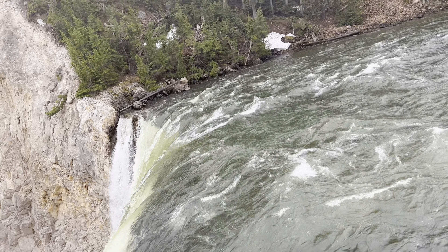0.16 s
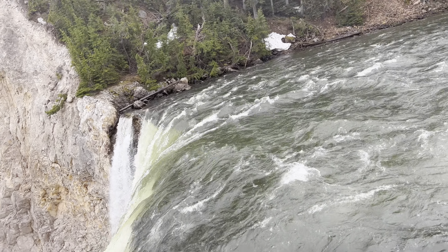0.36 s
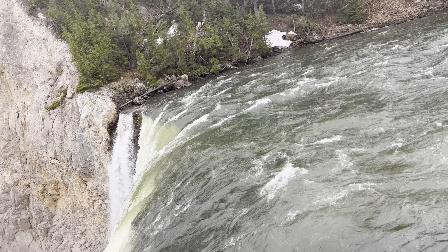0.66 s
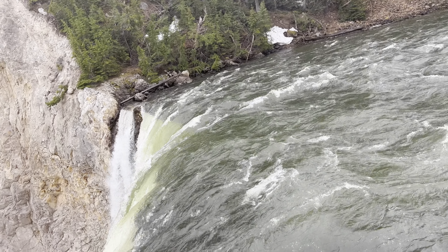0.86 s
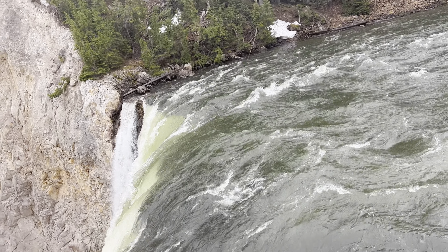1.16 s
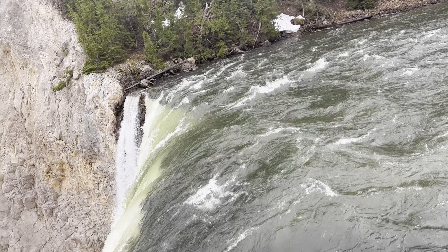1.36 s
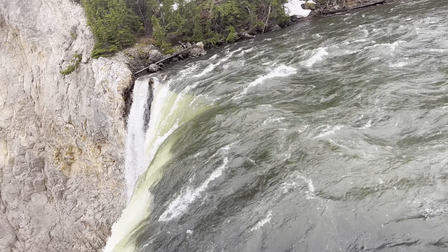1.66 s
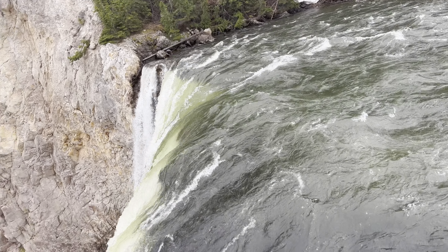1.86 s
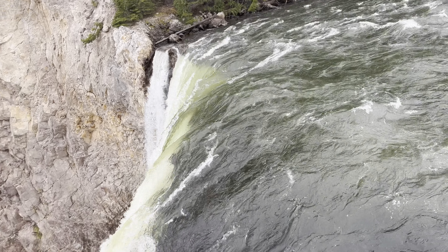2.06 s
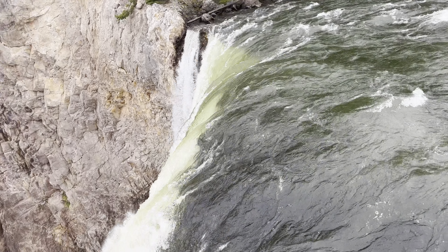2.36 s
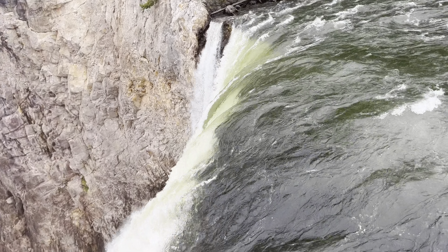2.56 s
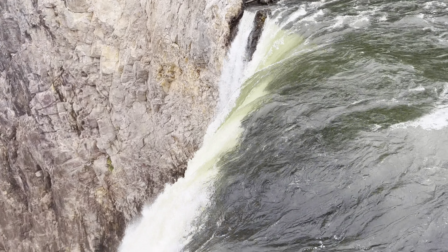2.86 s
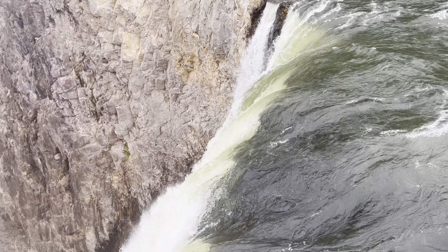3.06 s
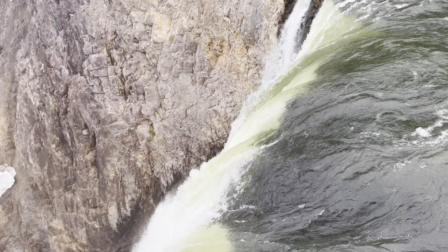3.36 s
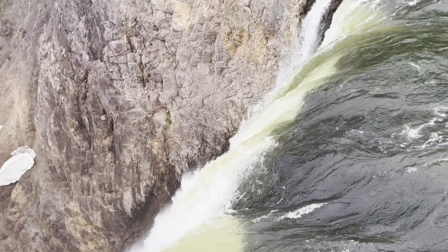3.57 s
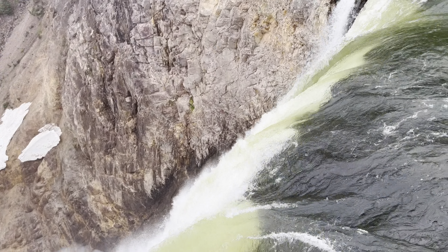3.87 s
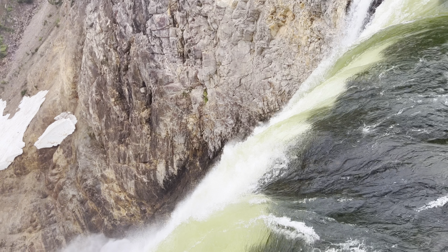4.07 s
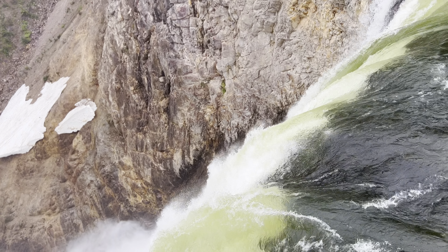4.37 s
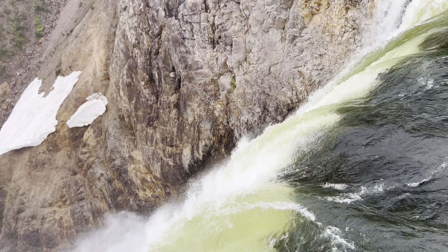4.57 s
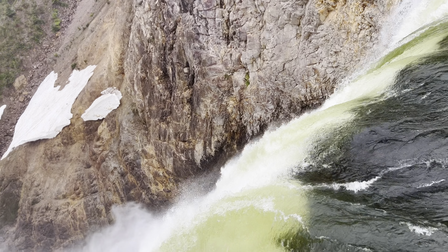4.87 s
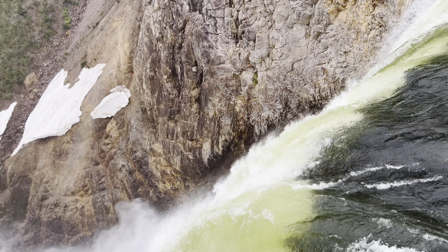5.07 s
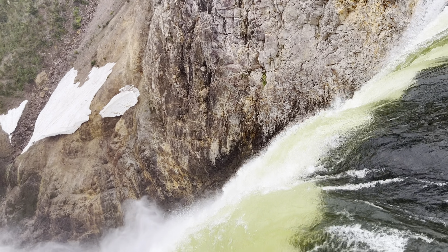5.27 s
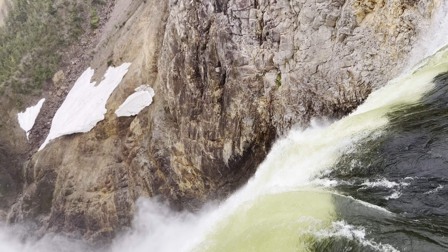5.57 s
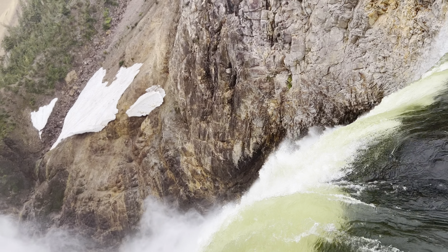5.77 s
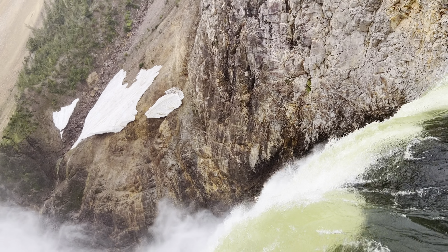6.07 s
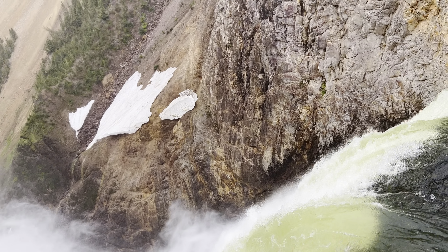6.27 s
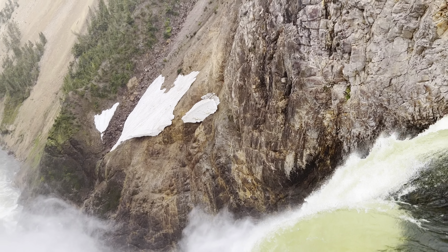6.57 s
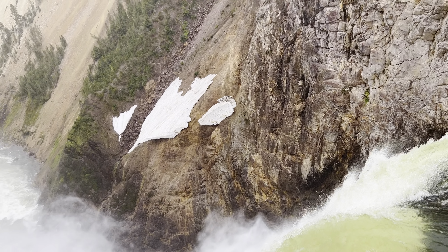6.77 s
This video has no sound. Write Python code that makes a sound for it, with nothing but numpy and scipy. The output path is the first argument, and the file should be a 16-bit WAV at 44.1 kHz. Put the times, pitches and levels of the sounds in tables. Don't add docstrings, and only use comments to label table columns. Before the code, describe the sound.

A powerful river roars continuously in an open canyon, heard through a handheld phone in stereo. From 0 to 2 s the rapids give a broad, even rush with airy hiss, while wind rumbles low and unevenly on the microphone, with a cluster of soft thumps around 0.2-0.4 s and more knocks near 0.7 and 0.9 s. Between about 2.2 and 3.6 s the phone turns to the brink and the roar swells by a few decibels, becoming fuller. Wind strengthens from 3.3 s, deep and fluttering, heaviest around 4.4-5.3 s, with thumps near 3.9, 4.4, 4.7 and 5.2 s. After 5.4 s the gusts ease to shorter flutters and rustles while the waterfall keeps pouring steadily. Small spray ticks land mostly on the right, the sharpest near 4.9 and 6.3 s. It stops at about 6.9 s, still roaring.

```python
import sys
import numpy as np
from scipy import signal
from scipy.fft import rfft, irfft, next_fast_len
from scipy.io import wavfile
from scipy.ndimage import uniform_filter1d, map_coordinates

SR = 44100
rng = np.random.default_rng(int(sys.argv[2]) if len(sys.argv) > 2 else 0)


def field_ratio(decibels):
    return 10 ** (np.asarray(decibels, dtype=float) / 20)


def master_out(mix):
    frames = np.transpose(np.atleast_2d(mix))
    ceiling = np.clip(frames, -1, 1)
    pcm = np.round(ceiling * 32767).astype(np.int16)
    wavfile.write(sys.argv[1], SR, pcm)


N = 305613
SIZE = next_fast_len(N)

# frequency_hz, density_db_per_hz, left_over_right_db, likeness_0_to_1, left_lead_rad
RAPIDS_ROAR = [(120, 7, -0.1, 0.93, 0.2), (300, 7, -0.5, 0.85, 0.3), (550, 5.2, 0.9, 0.63, 1.0),
               (850, 3.1, 1.9, 0.65, 1.8), (1150, -0.0, 2.1, 0.45, 2.0), (1450, -1.3, 0.2, 0.24, 2.6),
               (1750, -3.8, -2.7, 0.15, -0.7), (2050, -3.8, 0.3, 0.22, -1.0), (2400, -4.6, 2.2, 0.16, 1.2),
               (3000, -6.6, 4.9, 0.36, 0.8), (3900, -8.5, 5.3, 0.56, 0.5), (4800, -9.4, 8.4, 0.4, 0.8),
               (5600, -12.6, 6.0, 0.43, -0.9), (6300, -14.6, 5.3, 0.18, -0.1)]
BRINK_ROAR = [(120, 7, -0.4, 0.81, -0.1), (300, 7, -0.4, 0.78, 0.2), (550, 7, 1.4, 0.68, 1.0),
              (850, 4.0, 2.8, 0.48, 1.1), (1150, 3.2, 3.1, 0.53, 1.1), (1450, 2.0, 3.7, 0.26, 1.5),
              (1750, -0.9, 1.0, 0.34, -2.0), (2050, -3.8, -0.8, 0.28, -1.1), (2400, -3.5, 1.2, 0.41, 0.3),
              (3000, -5.0, 4.5, 0.54, 1.0), (3900, -7.1, 4.5, 0.72, 0.6), (4800, -9.4, 4.3, 0.56, 0.7),
              (5600, -11.9, 3.6, 0.53, -0.7), (6300, -13.1, 4.1, 0.17, -1.8)]
FALL_ROAR = [(120, 7, -0.4, 0.78, 0.0), (300, 7, -0.9, 0.8, 0.1), (550, 6.2, 0.2, 0.7, 0.7),
             (850, 2.8, 2.6, 0.54, 0.9), (1150, 1.4, 3.3, 0.44, 0.3), (1450, 1.2, 2.7, 0.44, 0.3),
             (1750, -1.2, 1.5, 0.42, -0.8), (2050, -1.7, -0.1, 0.39, -0.6), (2400, -3.7, 0.2, 0.4, 0.2),
             (3000, -5.5, 2.4, 0.65, 0.8), (3900, -6.7, 3.7, 0.79, 0.4), (4800, -10.0, 4.7, 0.48, 0.4),
             (5600, -11.9, 3.8, 0.55, -0.4), (6300, -13.4, 4.2, 0.19, 0.3)]
# frequency_hz, density_db_per_hz
SPRAY_HISS = [(7000, 3), (7600, 1), (8500, -0.4), (9500, -0.5), (10500, -3.5), (11500, -6), (13000, -6),
              (14300, -6), (15500, -8.5)]
# frequency_hz, gain_db
ROAR_COLOUR = [(500, -0.24), (1000, 0), (1600, 0.54), (2500, 1), (3300, -0.15), (6300, -0.14)]
# time_s, aim (0 rapids, 1 brink, 2 and beyond fall), roar_db
PHONE_TURN = [(0, 0.036, -30), (1.0, 0.069, -29.5), (1.3, 0.1, -28.5), (2.2, 0.13, -28), (2.9, 0.67, -26.7),
              (3.6, 1.08, -26), (4.3, 1.32, -26), (4.9, 2.03, -26.5), (5.45, 1.97, -26), (6.0, 3, -26.5),
              (6.93, 3.9, -26.5)]
# time_s, strength_db, large_over_middle_eddies_db
WIND_COURSE = [(0, -32.5, 4.5), (0.5, -35.5, 5), (0.85, -29, -1.5), (1.2, -37.5, 8), (1.5, -28.5, -1.5),
               (2.1, -29.5, -0.5), (2.5, -28, -0.5), (3.3, -24.5, -2.5), (3.7, -23, 1.5), (4.3, -24, 3.5),
               (4.45, -22, 5.5), (4.9, -23, 5.5), (5.2, -23.5, 5.5), (5.27, -23, -6), (5.45, -28, 1.5),
               (6.2, -28.5, -6), (6.35, -25.5, -1.5), (6.93, -27, -0.5)]
# centre_s, swell_db, eddy_hz, half_length_s
GUSTS = [(.08, 3.5, 60, 0.056), (.27, 6, 170, .06), (.34, 2, 60, .04), (.37, 8, 320, .04),
         (.55, 2, 320, .03), (.84, 5, 320, .07), (0.917, 2.5, 170, .04), (1.64, 3, 260, .04),
         (2.202, 2.5, 170, 0.054), (2.45, 5, 150, 0.067), (2.665, 6.5, 320, 0.072), (3.5, 4, 250, .06),
         (3.597, 5.5, 130, 0.098), (3.88, 3, 60, 0.12), (3.964, 2.5, 170, 0.059), (4.24, 1, 60, 0.037),
         (4.426, 6, 200, 0.032), (4.503, 3.5, 320, 0.053), (4.67, 3, 100, .04), (4.684, 6.5, 320, 0.031),
         (4.893, 8, 248, 0.055), (5.28, 6, 250, .03), (5.174, 1, 60, .04), (5.703, 5.5, 60, 0.041),
         (5.867, 6, 120, 0.036), (6.51, 6, 200, .05), (6.69, 4.5, 220, 0.04), (6.83, 5.5, 320, 0.037)]
EDDY_HZ = [65, 170, 320]
# frequency_hz, density_db_per_hz
LARGE_EDDIES = [(15, -45), (25, -27), (38, -7), (50, 0), (60, 1.5), (75, -0.1), (100, -1.5), (135, -10),
                (200, -18.5), (400, -120)]
MIDDLE_EDDIES = [(50, -60), (90, -7), (125, 0.5), (230, 1), (310, -11), (450, -9.5), (900, -120)]
SMALL_EDDIES = [(120, -60), (210, -18.5), (290, -3), (420, -10.5), (600, -14.5), (850, -27), (1300, -70),
                (2500, -120)]
# start_s, peak_db, start_hz, rise_s, pitch_halves_after_s
THUMPS = [(.202, -17, 700, .004, .003), (.258, -17, 300, .007, .01), (.306, -18, 700, .005, .004),
          (.318, -11, 120, .008, .015), (.353, -12.5, 220, .004, .006), (.378, -19, 700, .006, .004),
          (.539, -14, 600, .005, .006), (.687, -10, 1100, .004, .0015), (.693, -7, 150, .007, .012),
          (.915, -17, 800, .003, .003), (.972, -18, 500, .003, .003), (3.842, -11, 500, .006, .003),
          (3.926, -10, 400, .006, .004), (4.377, -12, 600, .008, .003), (4.66, -12, 500, .009, .003),
          (5.165, -10, 60, .016, .1), (5.264, -8, 380, .006, .012), (5.279, -14, 300, .006, .02)]
# peak_time_s, peak_db, pitch_hz
LOUD_DROPS = [(0.0479, -12, 1300), (1.3664, -10, 1240), (1.4098, -13, 1570), (1.6716, -10, 1530),
              (2.6749, -11, 1730), (3.0274, -12, 1360), (3.0539, -11, 1670), (3.2685, -13, 1460),
              (3.5103, -9, 1850), (3.5625, -12, 2040), (3.8799, -9, 1470), (4.4716, -12, 1680),
              (4.895, -5, 1440), (5.1314, -12, 1980), (5.7387, -13, 1450), (6.1944, -12, 1700),
              (6.2903, -6, 1660), (6.547, -11, 1940), (6.7475, -13, 1520)]

PORT_GAP_HZ = 3820
HISS_DB, HISS_TURN_DB = -8.5, -1.37
REACH_OCTAVES = 0.87
MEAN_WIND_DB, RUSTLE_DB, RUSTLE_GROWS = -28, -30.5, 1.08
ALIKE, ALIKE_PER_DB = .82, -.015
CLEAN_DB, RAGGED_PER_DB = -4, .045


def river():
    turned, roar_db = curves(PHONE_TURN)
    aim = np.clip(turned, 0, 2)
    hiss_db = roar_db + HISS_DB + HISS_TURN_DB * turned
    surge_db = .3 * wobble(7)
    views = [(RAPIDS_ROAR, 3.5), (BRINK_ROAR, 3), (FALL_ROAR, 2.5)]
    body = 0
    for place, (view, view_db) in enumerate(views):
        share = np.sqrt(np.clip(1 - np.abs(aim - place), 0, 1))
        body = body + field_ratio(view_db) * share * roar(view)
    spray = field_ratio(hiss_db + 0.25 * wobble(12)) * hiss()
    return field_ratio(surge_db) * (field_ratio(roar_db) * body + spray)


def roar(view):
    (a, b), hz = patchy(depth_db=0.64)
    rows = np.array(view)
    link = np.clip(0.94 * rows[:, 3], 0, 1) * np.exp(-1j * rows[:, 4])
    db, pan_db, real, imag = along(np.c_[rows[:, :3], link.real, link.imag], hz)
    unshared = np.sqrt(np.abs(1 - real ** 2 - imag ** 2))
    right = (real + 1j * imag) * a + unshared * b
    colour = field_ratio(db + along(ROAR_COLOUR, hz)[0])
    low_pass = slope(hz, corner_hz=6660, order=40)
    high_pass = slope(293, hz + 1, order=4)
    return waveform(colour * low_pass * high_pass * [a * field_ratio(.6 * pan_db), right * field_ratio(-.6 * pan_db)])


def hiss():
    (a, _), hz = patchy(depth_db=0.53)
    high_pass = slope(6740, hz + 1, order=40)
    delay = np.exp(-2j * np.pi * hz / PORT_GAP_HZ)
    return waveform(field_ratio(along(SPRAY_HISS, hz)[0]) * high_pass * [a * delay, a])


def wind():
    strength_db, large_db = curves(WIND_COURSE)
    large_gust, middle_gust, small_gust = gusts()
    over_mean_db = strength_db - MEAN_WIND_DB
    alike = ALIKE + ALIKE_PER_DB * over_mean_db
    jolt = wobble(25)

    buffet_db = strength_db + large_db + large_gust + 1.1
    flutter_db = strength_db + middle_gust + 0.72
    rustle_db = RUSTLE_DB + RUSTLE_GROWS * over_mean_db + small_gust
    buffet = field_ratio(buffet_db) * eddies(LARGE_EDDIES, alike + .08, .6 * jolt)
    flutter = field_ratio(flutter_db) * eddies(MIDDLE_EDDIES, alike - .02, 1.43 * jolt)
    rustle = field_ratio(rustle_db) * eddies(SMALL_EDDIES, alike - .04, 1.2 * jolt + 1.3 * wobble(60))
    return buffet + flutter + rustle


def gusts():
    s, db, hz, half = np.transpose(GUSTS)
    t = np.arange(0, N / SR + .01, .005)
    octaves_off = np.log2(hz / np.c_[EDDY_HZ])
    felt_db = db * np.exp(-(octaves_off / REACH_OCTAVES) ** 2)
    swell = np.exp(-((t[:, None] - s) / half) ** 2)
    return curves(np.c_[t, swell @ felt_db.T])


def eddies(spectrum, alike, lumps_db):
    hz = np.fft.rfftfreq(SIZE, 1 / SR)
    pair = waveform(rfft(rng.standard_normal((2, SIZE))) * field_ratio(along(spectrum, hz)[0]))
    power = np.abs(uniform_filter1d(pair ** 2, size=SR // 10, axis=1))
    mid, side = pair / (power + 0.031) ** 0.29
    angle = np.arccos(np.clip(alike, 0, 1)) / 2
    shared, opposed = np.cos(angle) * mid, np.sin(angle) * side
    return unit(field_ratio(lumps_db)) * np.array([shared + opposed, shared - opposed])


def thumps():
    out = np.zeros(N + SR)
    band = signal.butter(2, [150, 800], "band", fs=SR, output="sos")
    tearing = unit(signal.sosfilt(band, rng.standard_normal(N + SR)))
    for s, db, start_hz, rise, fall in THUMPS:
        start = round(s * SR)
        ragged = RAGGED_PER_DB * (CLEAN_DB - db)
        wave = swoop(start_hz, rise, fall)
        t = np.arange(len(wave)) / SR
        burst = tearing[start:][:len(wave)] * (t / rise) * np.exp(1 - t / rise)
        out[start:][:len(wave)] += field_ratio(db) * ((1 - ragged) * wave + .7 * ragged * burst)
    return out[:N]


def drops():
    faint = rng.random((60, 3)) * [N / SR, 6, 900] + [0, -23, 1200]
    out = np.zeros(N + SR)
    for s, db, hz in [*LOUD_DROPS, *faint]:
        wave = swoop(2.1 * hz, .65 / hz, fall=1.1 / hz)
        start = round((s - .9 / hz) * SR)
        out[start:][:len(wave)] -= field_ratio(db - 1.5) * wave
    return out[:N] * field_ratio([[-16], [0]])


def swoop(start_hz, rise, fall):
    t = np.arange(int(4 * rise * SR)) / SR
    phase = 2 * np.pi * start_hz * fall * np.log(1 + t / fall)
    return np.sin(phase) * (t / rise) * np.exp(1 - t / rise)


def patchy(depth_db):
    z = signal.stft(rng.standard_normal((2, N)), nperseg=512)[2]
    field = uniform_filter1d(rng.standard_normal(z.shape[1:]), size=7, axis=0)
    field = uniform_filter1d(field, size=10, axis=1)
    pair = signal.istft(z * field_ratio(depth_db * unit(field)), nperseg=512)[1][:, :N]
    return rfft(pair, SIZE), np.fft.rfftfreq(SIZE, 1 / SR)


def slope(hz, corner_hz, order):
    return 1 / np.sqrt(1 + (hz / corner_hz) ** order)


def waveform(spectra):
    return unit(irfft(spectra, SIZE)[:, :N])


def unit(x):
    return x / np.sqrt(np.mean(x ** 2) + 1e-20)


def along(points, hz):
    f, *cols = np.transpose(points)
    return [np.interp(np.log(hz + 1), np.log(f + 1), c) for c in cols]


def curves(rows):
    s, *cols = np.transpose(rows)
    return [np.interp(np.arange(N) / SR, s, c) for c in cols]


def wobble(rate):
    knots = rng.standard_normal(int(N * rate / SR) + 4)
    return map_coordinates(knots, [np.arange(N) * rate / SR])


def scene():
    return river() + wind() + thumps() + drops()


def top_cut(x):
    return signal.sosfilt(signal.butter(12, 15790, fs=SR, output="sos"), x)


def record(dry):
    ceiling, knee = .9, 5
    limited = dry / (1 + np.abs(dry / ceiling) ** knee) ** (1 / knee)
    return top_cut(limited)


dry = scene()
out = record(dry)
master_out(out)
```